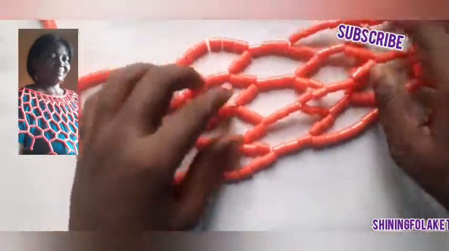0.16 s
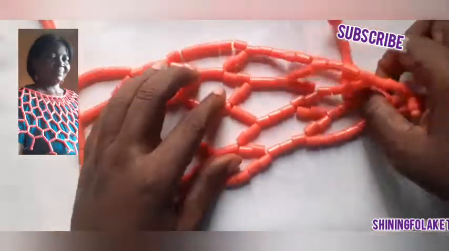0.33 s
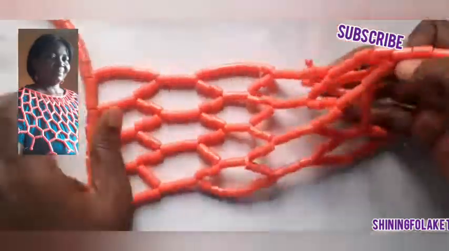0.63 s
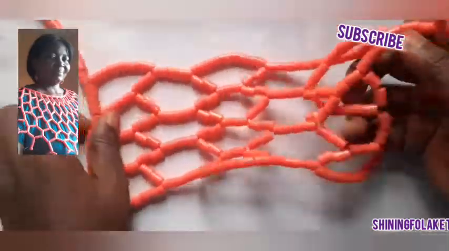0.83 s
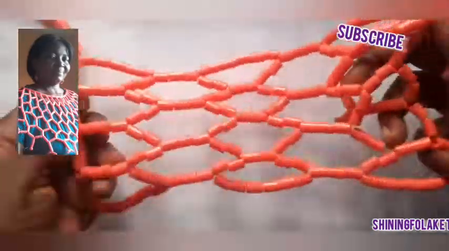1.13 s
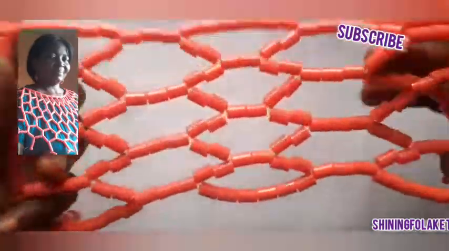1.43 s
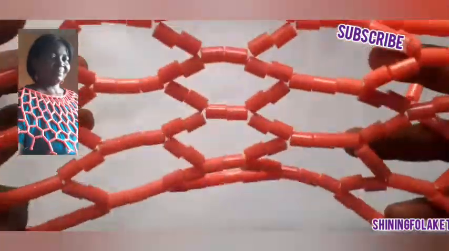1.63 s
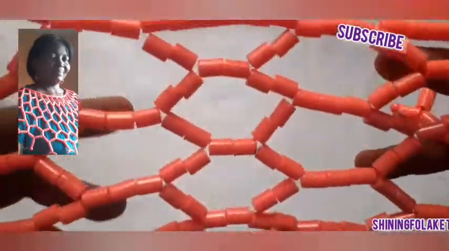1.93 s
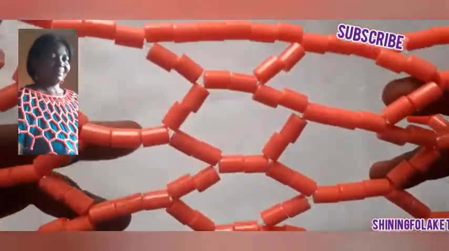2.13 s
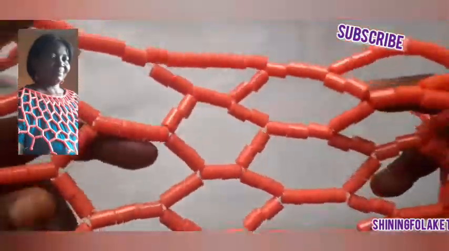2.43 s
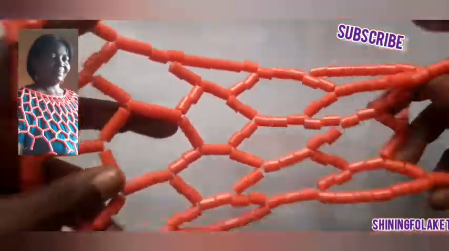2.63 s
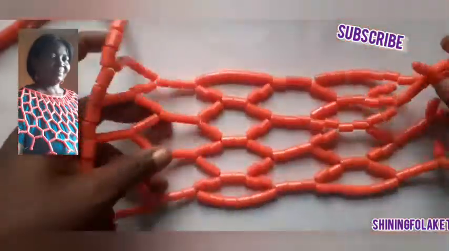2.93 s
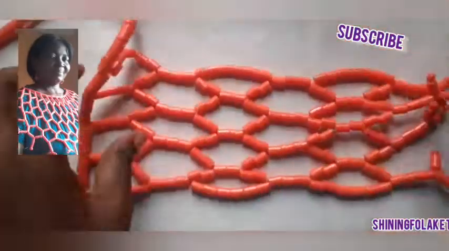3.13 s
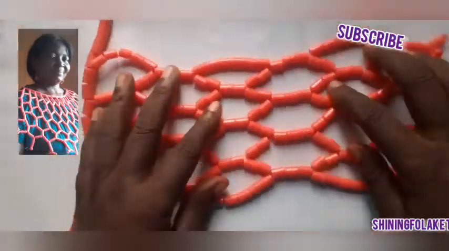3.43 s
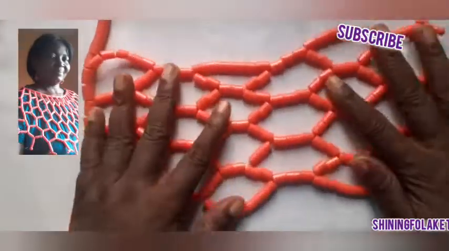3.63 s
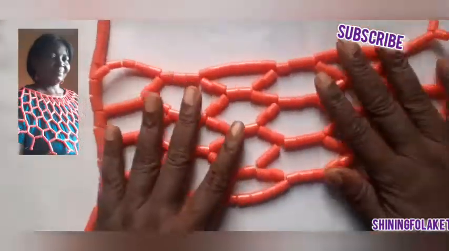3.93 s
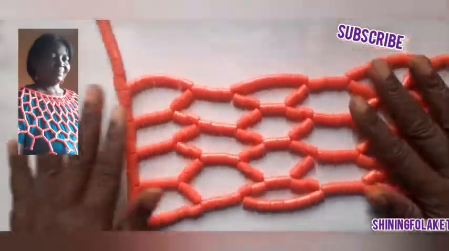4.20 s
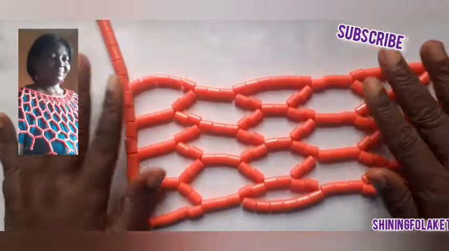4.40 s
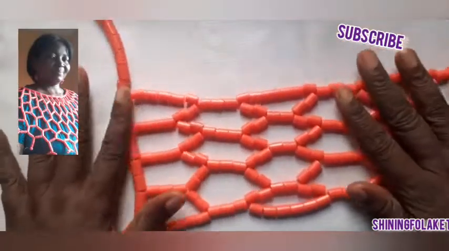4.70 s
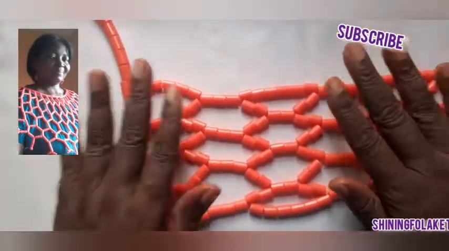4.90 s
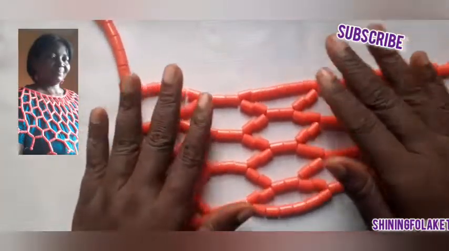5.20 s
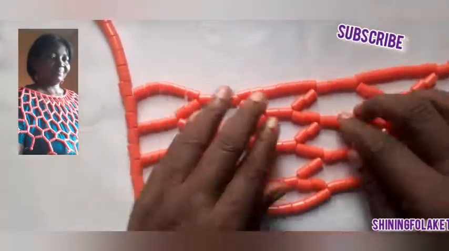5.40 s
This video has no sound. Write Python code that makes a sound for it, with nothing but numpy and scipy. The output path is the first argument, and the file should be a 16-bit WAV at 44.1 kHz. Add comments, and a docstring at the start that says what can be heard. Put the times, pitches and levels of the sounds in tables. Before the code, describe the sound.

Close, grainy rustling and clicking of plastic beads being slid, lifted and smoothed flat, with dull knocks on a tabletop.

```python
"""Bead net on a table

A net of plastic tube beads is dragged, lifted, laid down and smoothed flat on a cloth-covered table
in a small room. Stick-slip friction makes a dense, grainy rustle; single beads click on impact, and
the stretched thread rasps through the tubes. Hands and net excite the modes of the hollow table,
which thumps and rumbles. All is close to the microphone and a little to its right."""
import sys
import numpy as np
from scipy import signal
from scipy.fft import rfft, irfft, next_fast_len
from scipy.io import wavfile

SR = 44100
rng = np.random.default_rng(int(sys.argv[2]) if len(sys.argv) > 2 else 0)


def master_out(mix):
    """Clip the mix to full scale and print it as 16-bit PCM to the path in sys.argv[1]."""
    frames = np.transpose(np.atleast_2d(mix))
    ceiling = np.clip(frames, -1, 1)
    pcm = np.round(ceiling * 32767).astype(np.int16)
    wavfile.write(sys.argv[1], SR, pcm)


N = 244755
TIME = np.arange(N) / SR
FFT_SIZE = next_fast_len(N + SR // 2, real=True)
FREQS = np.maximum(np.arange(FFT_SIZE // 2 + 1) * SR / FFT_SIZE, 1)


# Spectrum of beads rubbing on cloth and on each other: f/Hz, density level/dB
FRICTION_SPECTRUM = [(450, 1.5), (750, 2), (1200, -2), (1650, -1.5), (2100, 0), (2550, 1), (3100, -2.5),
                     (4000, -6), (5200, -6), (7000, -5), (8500, -2), (9900, -11), (12500, -6),
                     (15800, -10.5), (17500, -20)]

def sliding_beads(rustle_db, scrape_db, rattle_db, cloth_cutoff_hz=11100):
    """Source and filter: the same slips sound in the hollow tubes, the cloth and the hard rims."""
    loose = stick_slip(per_s=2600, spread_db=2.2, smooth=.55, bunch_db=1.9)
    pressed = stick_slip(per_s=14000, spread_db=1.5, smooth=1.3, bunch_db=.7)
    pressed = signal.sosfilt(signal.butter(1, cloth_cutoff_hz, fs=SR, output="sos"), pressed)
    # loose beads tick; beads pressed into the cloth are muffled and rub evenly
    loose_share = 1 / (1 + from_db(scrape_db - rattle_db + 5) ** 2)
    friction = np.sqrt(loose_share) * unit_rms(loose) + np.sqrt(1 - loose_share) * unit_rms(pressed)
    friction = shifting_resonances(friction, depth_db=3.5, width_hz=170)
    colour = from_db(at_hz(FRICTION_SPECTRUM, FREQS))
    scrape = from_db(scrape_db) * stereo(friction, colour * band(500, 2100))
    rustle = from_db(rustle_db) * stereo(friction, colour * band(2100, 3650))
    rattle = from_db(rattle_db) * stereo(friction, colour * band(4000, 21000))
    return scrape + rustle + rattle


def stick_slip(per_s, spread_db, smooth, bunch_db):
    """Stick-slip friction: bunches of uneven random impulses over smooth noise."""
    sizes = from_db(spread_db * np.minimum(rng.exponential(1, N), 4))
    ticks = (rng.random(N) < per_s / SR) * sizes * rng.standard_normal((2, N))
    knots_s = np.arange(0, 6, 1 / 140)
    bunches = from_db(bunch_db * np.interp(TIME, knots_s, rng.standard_normal(len(knots_s))))
    return bunches * (ticks / ticks.std() + smooth * rng.standard_normal((2, N)))


def shifting_resonances(x, depth_db, width_hz, size=2048):
    """Time-varying filtering: beads rub in turn, each with its own spectral peaks and dips."""
    hz, _, spectra = signal.stft(x, SR, nperseg=size)
    peaks = rng.standard_normal((spectra.shape[-1], 400))
    ripple = np.array([np.interp(hz / width_hz, np.arange(len(row)), row) for row in peaks])
    _, coloured = signal.istft(spectra * from_db(depth_db * ripple.T), SR, nperseg=size)
    return unit_rms(coloured[:, :N])


# Hand strokes: t/s, duration/s, rustle level/dB, hand weight/dB, bead looseness/dB
HAND_STROKES = [(-0.06, 0.075, -54, -4, -6), (0.153, 0.068, -54, -5.5, -3.5),
                (0.191, 0.044, -46, -11, -1.5), (0.221, 0.082, -48, -6, -.5), (0.287, 0.17, -54, -10.5, -5),
                (0.465, 0.099, -52.5, -8.5, -4.5), (0.594, 0.14, -64, -2, 0.5),
                (0.703, .1, -54.5, -4.5, -3), (0.825, .04, -53.5, -4.5, 0.5), (0.888, 0.11, -60, -2.5, 3),
                (0.962, 0.17, -78.5, 10.5, 4), (1.131, 0.13, -65.5, 4, 3.5), (1.353, 0.21, -80, 7, 9.5),
                (1.893, 0.099, -93, 6.5, 8), (2.152, .27, -92.5, 5.5, 12), (2.427, .13, -92.5, 10.5, 10),
                (2.546, 0.16, -71, 2, 8.5), (2.716, 0.051, -57, -4, -0.5), (2.823, 0.064, -45.5, -5, -3.5),
                (2.915, 0.15, -55, -3.5, 1.5), (3.116, 0.019, -56, -1, 1), (3.136, 0.2, -70.5, 7.5, 6.5),
                (3.235, 0.018, -57, 2.5, 9.5), (3.31, 0.056, -49.5, -2.5, 0),
                (3.345, 0.053, -41, -13, -3.5), (3.399, 0.084, -50, -5, 0.5),
                (3.487, 0.11, -64.5, 3.5, 1.5), (3.644, 0.062, -52.5, -3, -1),
                (3.742, 0.21, -65.5, -1.5, -3), (3.916, 0.025, -47, -9.5, -5),
                (3.947, 0.18, -51.5, -5.5, -6), (4.097, 0.085, -54, -1.5, -3.5),
                (4.228, 0.056, -67.5, 2, -1.5), (4.394, 0.056, -86, 9, 7), (4.449, 0.11, -65.5, 3.5, 1.5),
                (4.513, 0.012, -42, -14, -8), (4.538, 0.15, -61, -0.5, -1.5), (4.748, 0.14, -94, 14, 8),
                (4.972, 0.032, -54.5, -3, -7.5), (5.008, 0.08, -59.5, -0.5, -6),
                (5.115, 0.064, -59.5, -1, -1), (5.183, 0.076, -85, 10, -5), (5.384, 0.054, -67, 1.5, -4),
                (5.454, .04, -59, 0, -3), (5.511, 0.019, -50.5, -1, -4.5)]

def stroke_levels():
    """Incoherent strokes add in power. A heavy hand scrapes and shakes the table; loose beads rattle."""
    t = TIME[::20]
    power = np.array([stroke_envelope(t, start, length) ** 2 for start, length, *_ in HAND_STROKES])
    _, _, rustle_db, weight_db, loose_db = np.transpose(HAND_STROKES)
    scrape_db = rustle_db + weight_db
    rattle_db = rustle_db + loose_db
    rumble_db = rustle_db + 8.5 + 1.59 * weight_db
    layer_powers = from_db([rustle_db, scrape_db, rattle_db, rumble_db]) ** 2 @ power
    return [np.interp(TIME, t, db) for db in 10 * np.log10(layer_powers + 1e-20)]


def stroke_envelope(t, start, length, attack_share=.36):
    """Growth and exponential decay: the net gathers speed, slides, then settles as the hand stops."""
    attack = np.clip((t - start) / (attack_share * length), 0, 1)
    settle_t60_s = .26 * (length / .088) ** .45   # longer strokes stir more beads, which settle slowly
    decay = from_db(-60 * np.clip((t - start - length) / settle_t60_s, 0, 2))
    return np.sin(np.pi / 2 * attack) ** 2 * decay


# Distinct bead-on-bead impacts: t/s, peak level/dB, treble gain/dB, left re right/dB
BEAD_IMPACTS = [(0.1665, -39, -8, -9), (0.208, -25, -2, -6), (0.2432, -27, -8, -3), (0.2668, -24, 2, -4),
                (0.2794, -25, 4, -2), (0.5218, -30, -5, -6), (0.592, -26, 15, -2), (0.6692, -27, 11, -2),
                (0.697, -31, 4, 0), (0.9416, -34, 2, -6), (2.2476, -42, 26, -14), (2.2776, -51, 20, -11),
                (2.3624, -50, 24, -15), (2.6387, -38, 9, -6), (2.6612, -36, 4, -8), (2.6961, -32, -5, -6),
                (2.8198, -31, -3, -6), (2.8349, -27, -8, -4), (2.866, -21, -5, -2), (2.869, -17, -7, -5),
                (2.8799, -24, -8, -4), (2.9124, -27, 11, -1), (2.9522, -30, -5, -5), (3.012, -22, -4, -7),
                (3.045, -29, 5, -4), (3.1281, -31, -3, -3), (3.2489, -27, 4, -2), (3.2819, -32, 2, -7),
                (3.3213, -27, 6, -9), (3.4345, -26, 2, -8), (3.6411, -37, 3, -9), (3.6623, -31, -11, -5),
                (3.6891, -26, 9, -4), (3.7855, -39, -2, -5), (3.827, -32, 1, -8), (3.9275, -25, -7, -7),
                (3.9374, -28, -7, -5), (4.4722, -34, 0, -5), (4.4778, -37, -1, -4), (4.5248, -25, -8, -8),
                (4.5284, -21, -7, -5), (4.9774, -39, 3, -8), (4.9943, -26, -8, -5), (5.3945, -40, 7, -12),
                (5.4098, -36, -5, -6), (5.4365, -33, -4, -4), (5.4655, -30, -2, -8), (5.5326, -29, -7, -4)]
# Spectrum of one impact: f/Hz, level/dB
IMPACT_SPECTRUM = [(200, -14), (700, -5), (1500, -1), (2500, 2), (4300, -3), (6500, -2), (8500, -1),
                   (10000, -8), (13000, -6), (15800, -7), (17500, -35)]

def bead_clicks(strays, crunch_t60_s=.006, chatter_t60_s=.016, size=1024):
    """Impact excitation: a bead answers an impulse, a brief crunch and faint chatter on the thread."""
    out = np.zeros((2, N))
    t = np.arange(size) / SR
    hz = np.maximum(np.arange(size // 2 + 1) * SR / size, 1)
    treble = 1 / (1 + (4500 / hz) ** 4)
    for onset, peak_db, treble_db, left_db in BEAD_IMPACTS + strays:
        # rim on rim is bright, tube on tube is hollow
        response = minimum_phase(at_hz(IMPACT_SPECTRUM, hz) + treble_db * treble)
        chatter = .1 * rng.standard_normal((2, size)) * from_db(-60 * t / chatter_t60_s)
        crunch = .45 * rng.standard_normal(size) * from_db(-60 * t / crunch_t60_s)
        force = chatter + crunch
        force[:, 0] = 1   # the impulse
        click = signal.fftconvolve(force, response[None], axes=1)
        click *= from_db(peak_db) * pan(left_db) / np.abs(click.mean(axis=0)).max()
        lag_s = rng.normal(0, 2e-5)   # unequal paths to the two microphone ports
        add(out[0], onset + lag_s, click[0])
        add(out[1], onset, click[1])
    return out


def stray_impacts(rattle_db, per_s=12, above_rattle_db=20.5, treble_db=7.5, left_db=-2):
    """Poisson process: beads collide by chance, the harder the more they rattle."""
    onsets = np.flatnonzero(rng.random(N) < per_s / SR)
    scatter = rng.standard_normal((len(onsets), 2))
    return [(i / SR, rattle_db[i] + above_rattle_db - softer, treble_db - 2 * duller, left_db)
            for i, (softer, duller) in zip(onsets, scatter)]


# Hands and net landing: t/s, impulse level/dB, contact time/ms, clatter level/dB
TABLE_LANDINGS = [(0.206, -45, 1.4, -54), (0.714, -32.5, 7, -52), (0.731, -43, 2.2, -43.5),
                  (0.800, -36, 3.6, -52.5), (2.699, -44.5, 1.4, -54.5), (2.869, -35.5, 2.1, -33),
                  (3.13, -47, 0.79, -40), (3.247, -31, 5.9, -48), (3.314, -35, 7.6, -36.5),
                  (3.568, -34, 3.6, -50), (3.689, -51, 3, -38), (3.936, -41.5, 2.4, -53),
                  (4.525, -28.5, 5.6, -33.5), (4.978, -39, 5.2, -55), (4.994, -20.5, 10.4, -40.5),
                  (5.465, -28.5, 7.3, -39.5), (5.529, -34.5, 4.5, -44)]

def landing_force():
    """Impact pulses: the longer the contact, the less treble the force contains."""
    force = np.zeros(N)
    for onset, db, contact_ms, _ in TABLE_LANDINGS:
        age = np.arange(SR // 20) / SR * 1000 / contact_ms   # in contact times
        pulse = age * np.exp(-4 * age)
        add(force, onset, from_db(db) * pulse / pulse.sum())
    return force


# Spectrum of a strand hitting the table: f/Hz, density level/dB
CLATTER_SPECTRUM = [(150, -32.5), (500, -15.5), (1100, -2.5), (1700, -1.5), (2900, 7.5), (4500, 0.5),
                    (8500, 4), (10500, -42), (16000, 2)]

def strand_clatter(rise_s=.0015, fall_s=.004):
    """Superposed impacts: the beads of a landing strand all strike within a few milliseconds."""
    envelope = sum(from_db(db) * np.exp(-np.maximum((at - TIME) / rise_s, (TIME - at) / fall_s))
                   for at, _, _, db in TABLE_LANDINGS)
    hits = stick_slip(per_s=4000, spread_db=2, smooth=.4, bunch_db=0)
    return envelope * stereo(hits, from_db(at_hz(CLATTER_SPECTRUM, FREQS)))


# Modes of the hollow table: f/Hz, level/dB, T60/s
TABLE_MODES = [(94, -30.5, 0.069), (107, -17, 0.15), (122.4, 0.5, 0.32), (173.4, -7.5, 0.19),
               (234.4, -2, 0.17), (263.2, -4.5, 0.11), (306.4, -3, 0.085), (324.5, -2, 0.19),
               (362.7, -10, 0.13), (450, -19, 0.24), (670, -12, 0.073)]

def table_response(force):
    """Modal superposition: each mode is a damped oscillator driven by the same force."""
    out = np.zeros(N)
    for hz, db, t60 in TABLE_MODES:
        radius, angle = from_db(-60 / (t60 * SR)), 2 * np.pi * hz / SR
        feedback = [1, -2 * radius * np.cos(angle), radius * radius]
        mode = signal.lfilter([np.sin(angle), -np.sin(angle)], feedback, force + 1e-18)
        out += from_db(db) * mode / angle
    return out


def hollow_table(rumble_db, bass_cutoff_hz=82):
    """Free and forced vibration: landings thump the table, dragged beads keep it rumbling."""
    thumps = table_response(landing_force()) * pan(left_db=-7.5)
    bumps = shifting_resonances(rng.standard_normal((2, N)), depth_db=2.5, width_hz=60, size=4096)
    # small hard beads excite the upper modes more than a soft hand does
    hardness = from_db(at_hz([(100, -5.5), (240, 0.5), (500, -3.5)], FREQS))
    rumble = from_db(rumble_db) * stereo([table_response(side) for side in bumps], hardness)
    # the deepest bass of the thumps and rumble is thinned out
    bass_cut = signal.butter(3, bass_cutoff_hz, "high", fs=SR, output="sos")
    return signal.sosfilt(bass_cut, thumps + rumble)


# Rasp of the thread as the net is stretched: t/s, level/dB
THREAD_LEVELS = [(1.1, -78), (1.2, -64), (1.29, -71), (1.35, -67), (1.39, -73), (1.45, -64.5), (1.53, -69),
                 (1.62, -79), (1.9, -110)]
# Resonances of the drawn thread: f/Hz, half-width/Hz, level/dB
THREAD_RESONANCES = [(1780, 170, -1), (3480, 260, 0), (6200, 650, -4)]

def thread_rasp():
    """Friction-driven resonance: the taut thread, drawn through the tubes, excites three narrow peaks."""
    colour = sum(from_db(db) / (1 + ((FREQS - hz) / width) ** 2) for hz, width, db in THREAD_RESONANCES)
    rasp = stick_slip(per_s=1500, spread_db=2, smooth=.7, bunch_db=2.5)
    level_db = np.interp(TIME, *np.transpose(THREAD_LEVELS))
    return from_db(level_db) * stereo(rasp, colour)


def room_reflections(x, echo_s=.009, echo_db=-15.5, tail_db=-17, t60_s=.093, wall_cutoff_hz=4960):
    """Reflection and absorption: a near wall's echo and a diffuse tail, duller than the direct sound."""
    t = np.arange(SR // 2) / SR
    response = rng.standard_normal((2, len(t))) * from_db(-60 * t / t60_s) * (t > .003)
    response *= from_db(tail_db) / np.sqrt(np.sum(response ** 2, axis=1, keepdims=True))
    response[:, round(echo_s * SR)] += from_db(echo_db)
    transfer = rfft(response, FFT_SIZE) / np.hypot(1, FREQS / wall_cutoff_hz)
    return irfft(rfft(x, FFT_SIZE) * transfer, FFT_SIZE)[:, :N]


# Spectrum of the quiet room: f/Hz, density level/dB
AMBIENT_SPECTRUM = [(12, -45.5), (20, -5), (74, -17.5), (96, -7), (142, 0), (187, -8.5), (347, -4),
                    (499, -19), (1060, -30), (1150, -32.5), (5080, -38.5), (12400, -38), (16000, -46)]

def room_hush(level_db=-66.5):
    """Stationary noise: a faint background, strongest in the bass."""
    colour = from_db(at_hz(AMBIENT_SPECTRUM, FREQS))
    return from_db(level_db) * stereo(rng.standard_normal((2, N)), colour)


# Level difference between the channels: f/Hz, left re right/dB
CHANNEL_BALANCE = [(60, -21), (130, -11), (300, -11.5), (700, -9), (2500, -5), (8000, -5.5), (14000, 0)]
# Likeness of the channels: f/Hz, correlation coefficient
CHANNEL_CORRELATION = [(40, 0.93), (110, 1), (300, 1), (1000, 0.21), (2600, 0.24), (4000, 0.18),
                       (8000, 0.4), (14000, 0.9)]

def stereo(pair, colour):
    """Partial coherence: two independent signals, filtered, form left and right at unit rms."""
    mid, side = rfft(pair, FFT_SIZE)
    correlation = np.clip(at_hz(CHANNEL_CORRELATION, FREQS), 0, .999)
    channels = np.sqrt(1 + correlation) * mid + np.sqrt(1 - correlation) * side * np.array([[1], [-1]])
    balance = pan(at_hz(CHANNEL_BALANCE, FREQS))
    return unit_rms(irfft(channels * colour * balance, FFT_SIZE)[:, :N])


def pan(left_db):
    """Amplitude panning: left and right gains with a mean of 1."""
    ratio = from_db(np.atleast_1d(left_db))
    return 2 * np.array([ratio, np.ones_like(ratio)]) / (1 + ratio)


def from_db(db):
    """Amplitude ratio of a level."""
    return 10 ** (np.asarray(db) / 20)


def unit_rms(x):
    """Normalisation: the mean of the channels gets rms 1."""
    return x / np.sqrt(np.mean(np.atleast_2d(x).mean(axis=0) ** 2) + 1e-20)


def at_hz(points, hz):
    """Interpolation on a log-frequency axis."""
    known_hz, values = np.transpose(points)
    return np.interp(np.log(hz), np.log(known_hz), values)


def band(low_hz, high_hz):
    """Band-pass gain with fourth-order Butterworth edges."""
    return 1 / np.sqrt((1 + (low_hz / FREQS) ** 8) * (1 + (FREQS / high_hz) ** 8))


def minimum_phase(db):
    """Causal impulse response of a level spectrum, by folding its cepstrum."""
    cepstrum = irfft(np.log(from_db(db)))
    fold = 1 + np.sign(len(cepstrum) / 2 - np.arange(len(cepstrum)))
    fold[0] = 1
    return irfft(np.exp(rfft(cepstrum * fold)))


def add(track, onset_s, sound):
    """Superposition of a sound on a track."""
    start = int(np.clip(round(onset_s * SR), 0, N - 1))
    track[..., start:start + sound.shape[-1]] += sound[..., :N - start]


def scene():
    """Linear superposition of the beads, their reflections, the table and the background."""
    rustle_db, scrape_db, rattle_db, rumble_db = stroke_levels()
    beads = sliding_beads(rustle_db, scrape_db, rattle_db) + thread_rasp() + strand_clatter()
    beads += bead_clicks(stray_impacts(rattle_db))
    hush = room_hush()
    return beads + room_reflections(beads) + hollow_table(rumble_db) + hush


def record(dry, low_hz=34, high_hz=16000):
    """Band limiting: the small microphone loses the deepest bass, and the top is cut steeply."""
    thinned = signal.sosfilt(signal.butter(3, low_hz, "high", fs=SR, output="sos"), dry)
    return signal.sosfilt(signal.ellip(10, .1, 70, high_hz, fs=SR, output="sos"), thinned)


dry = scene()
out = record(dry)
master_out(out)
```